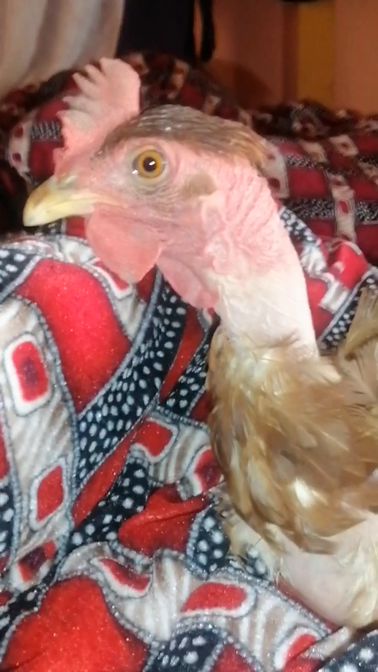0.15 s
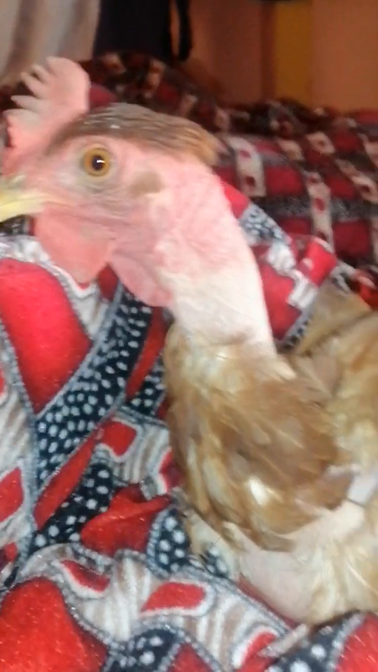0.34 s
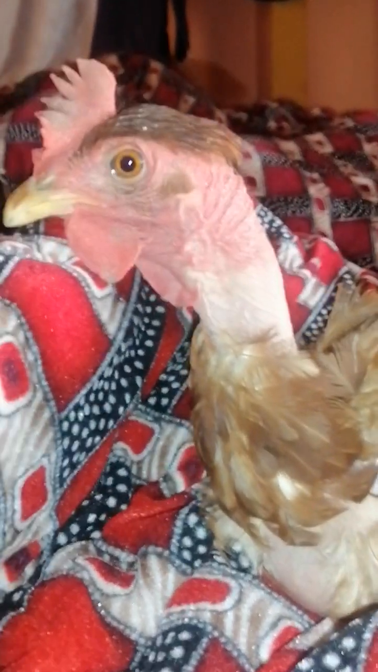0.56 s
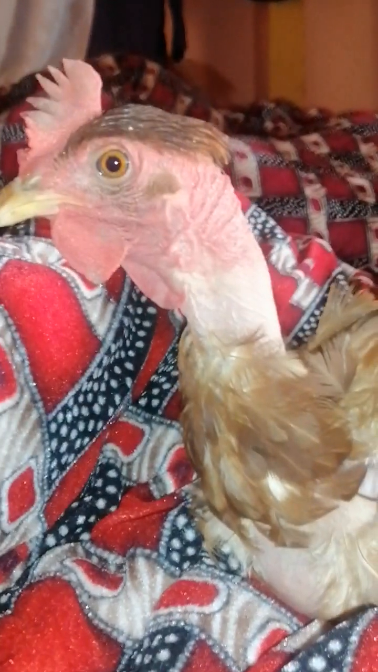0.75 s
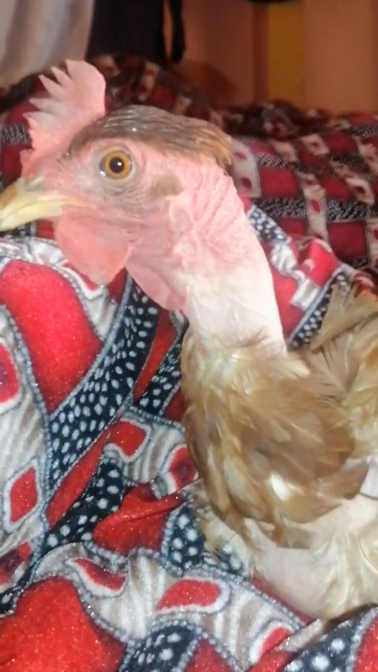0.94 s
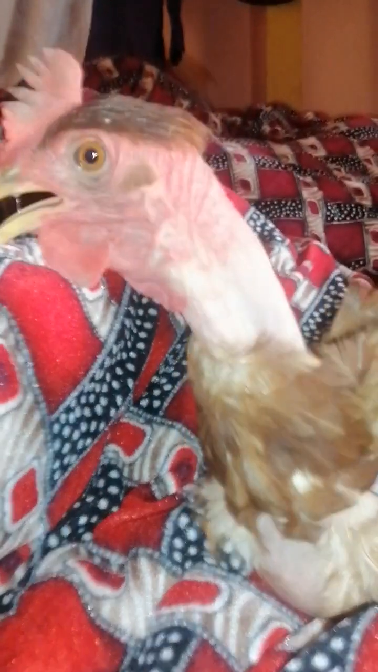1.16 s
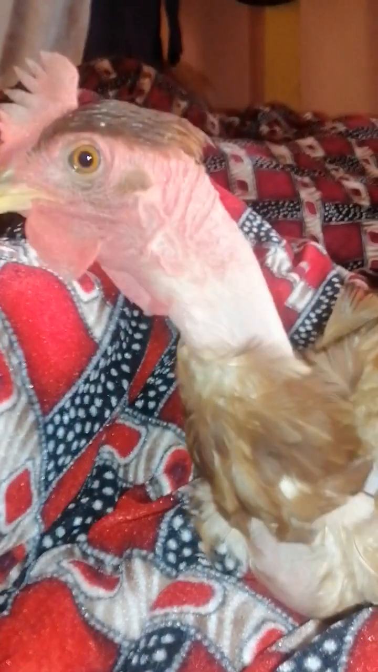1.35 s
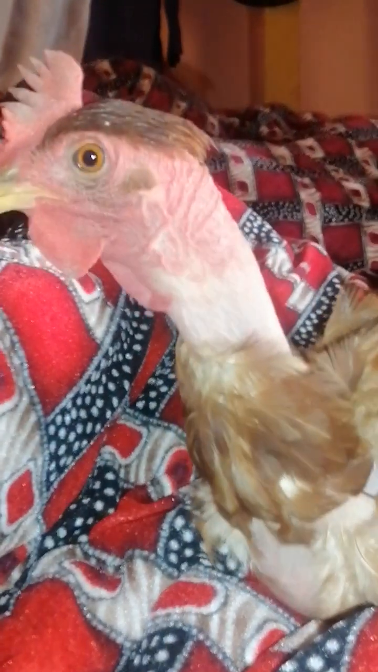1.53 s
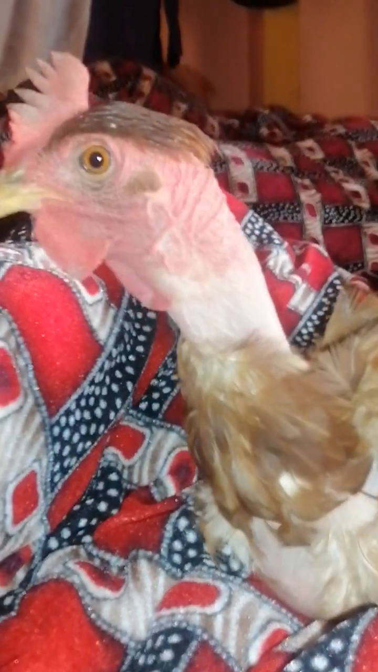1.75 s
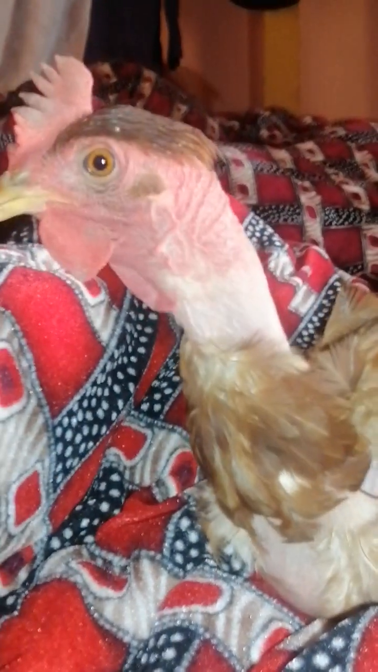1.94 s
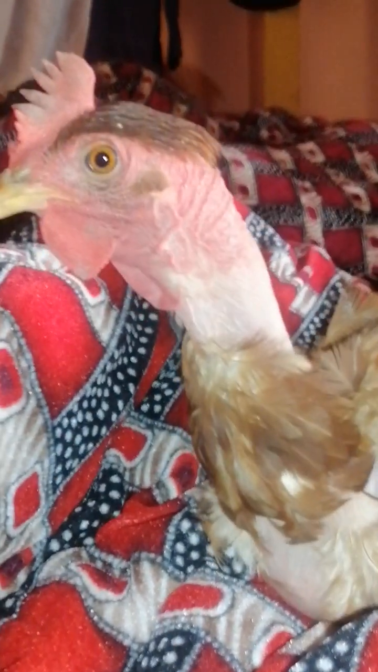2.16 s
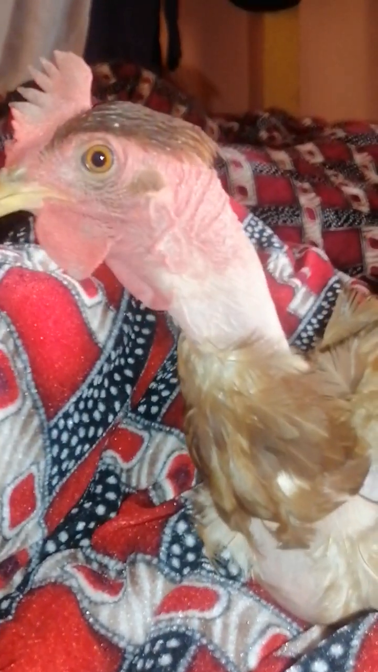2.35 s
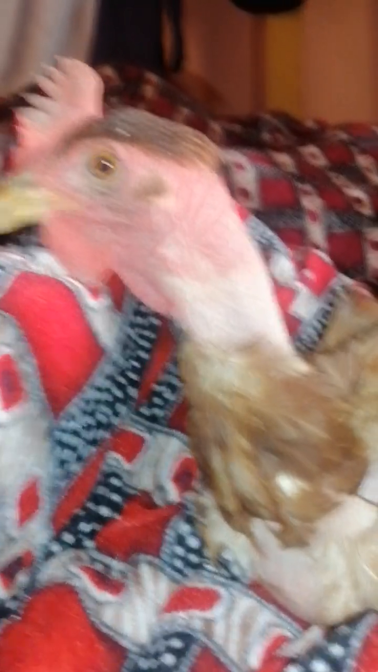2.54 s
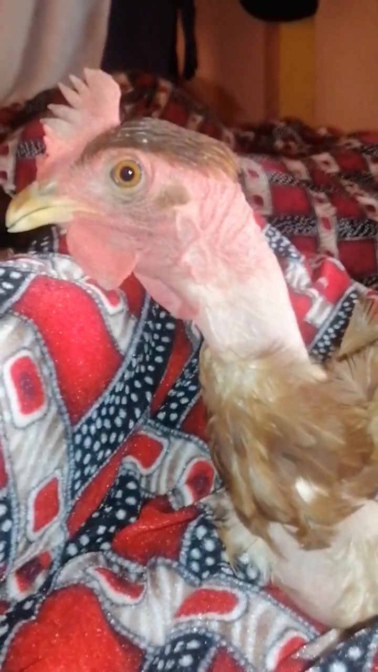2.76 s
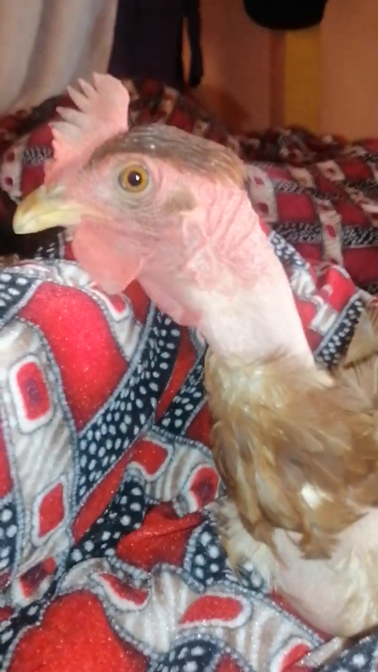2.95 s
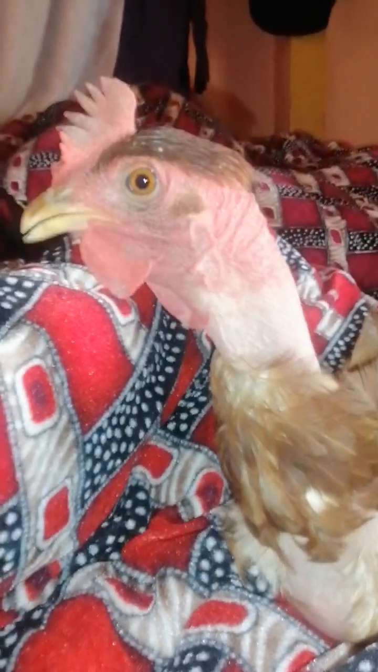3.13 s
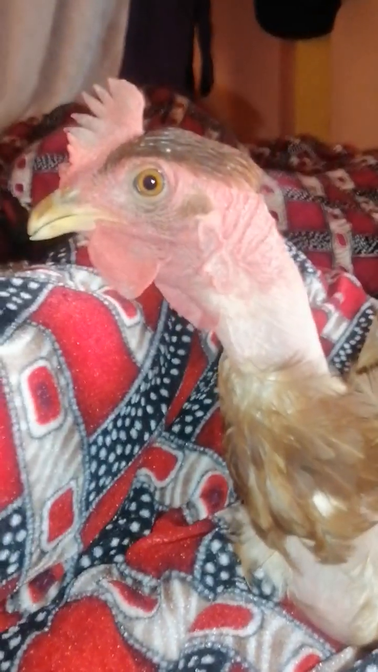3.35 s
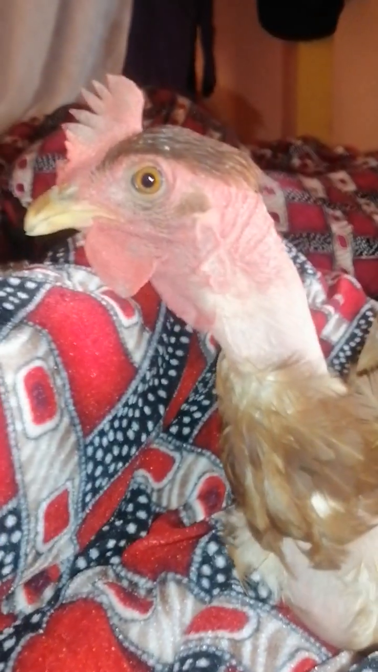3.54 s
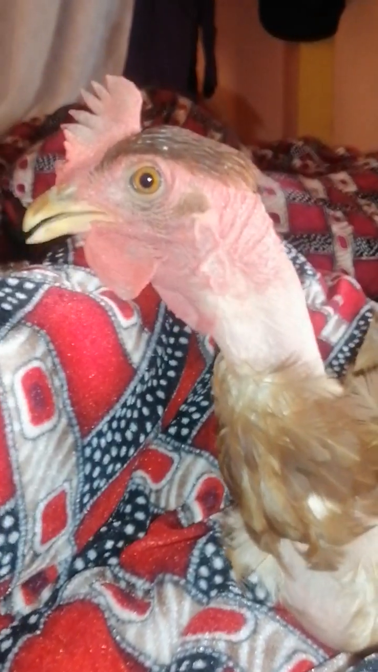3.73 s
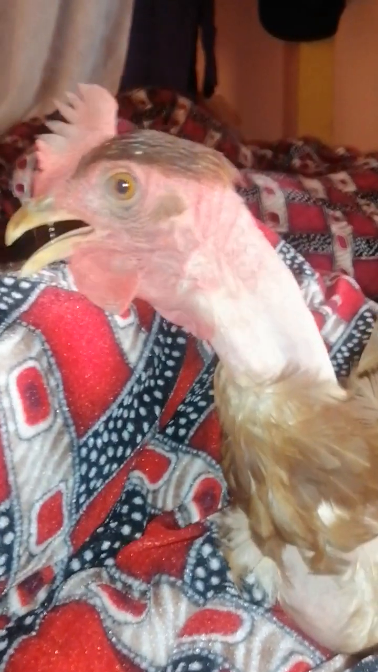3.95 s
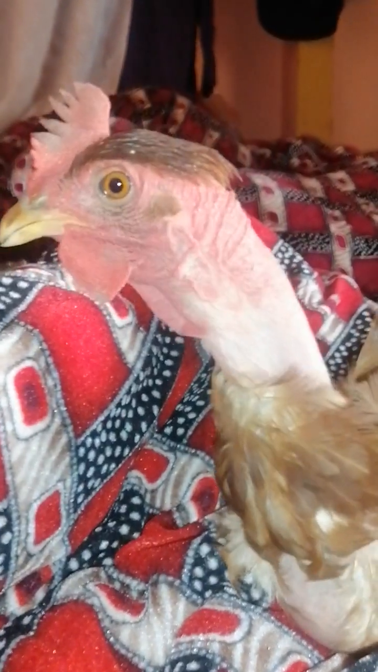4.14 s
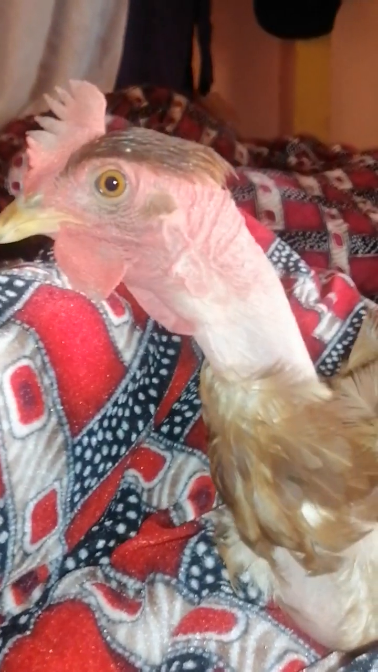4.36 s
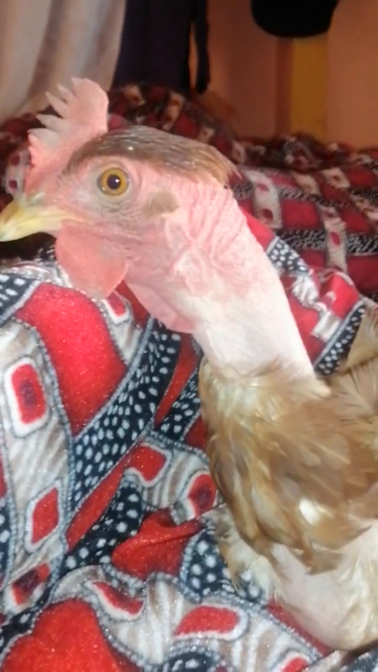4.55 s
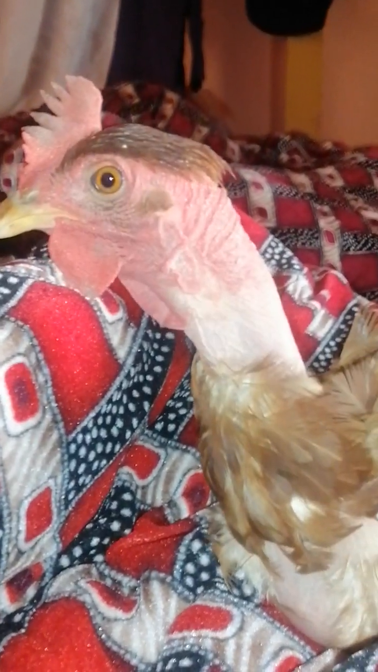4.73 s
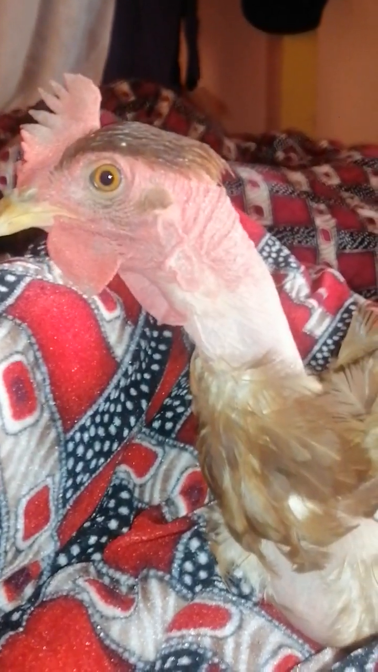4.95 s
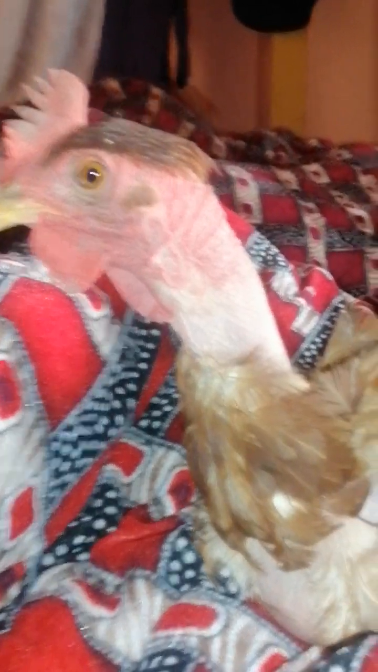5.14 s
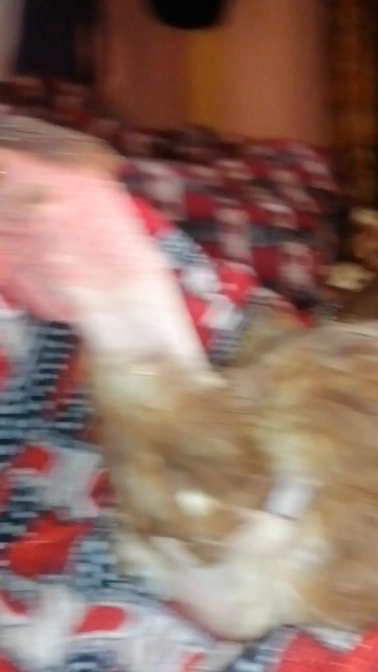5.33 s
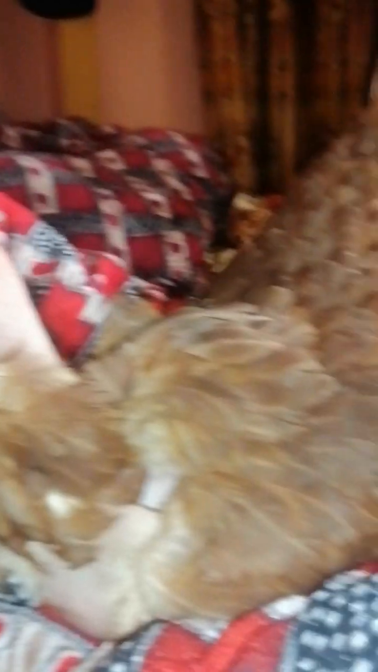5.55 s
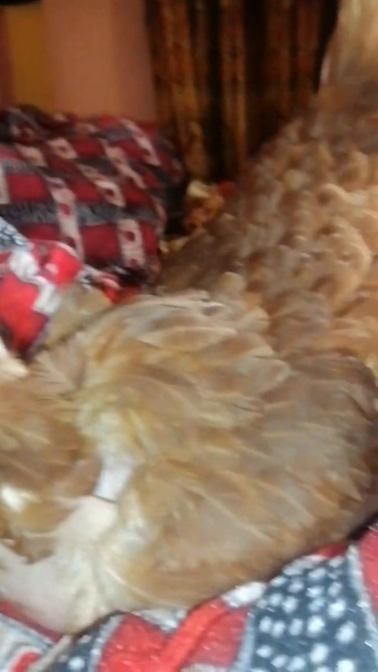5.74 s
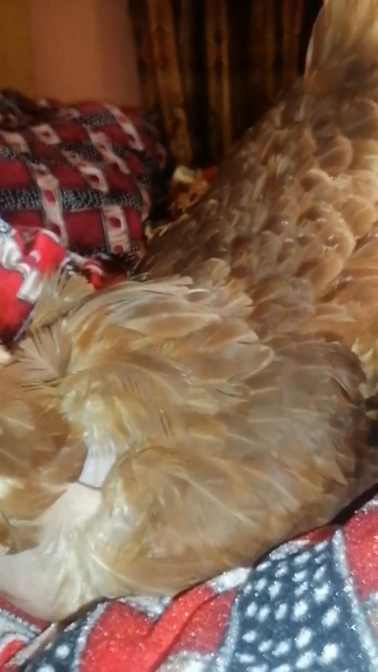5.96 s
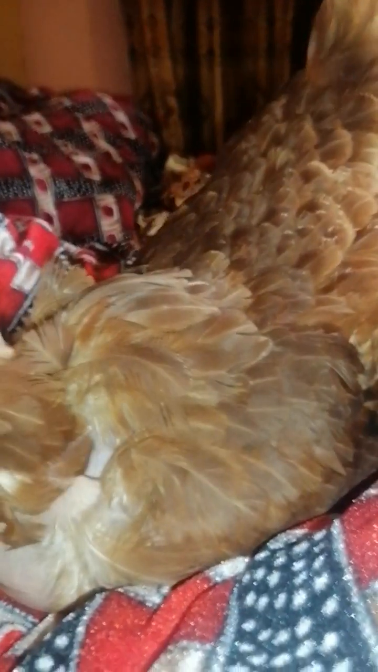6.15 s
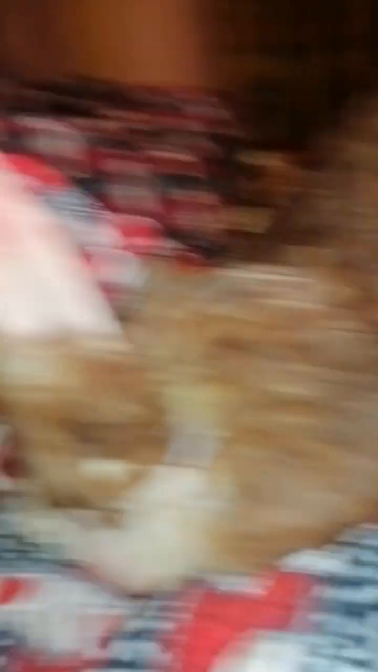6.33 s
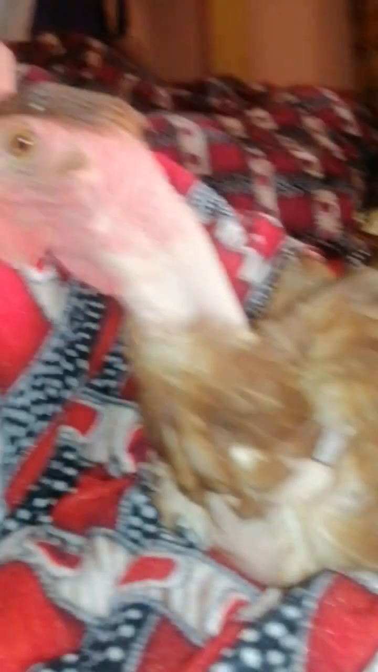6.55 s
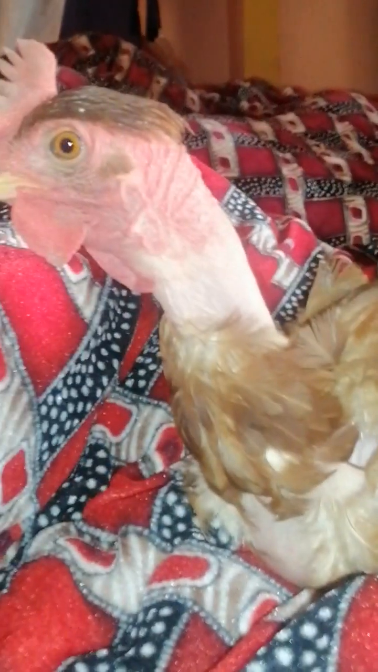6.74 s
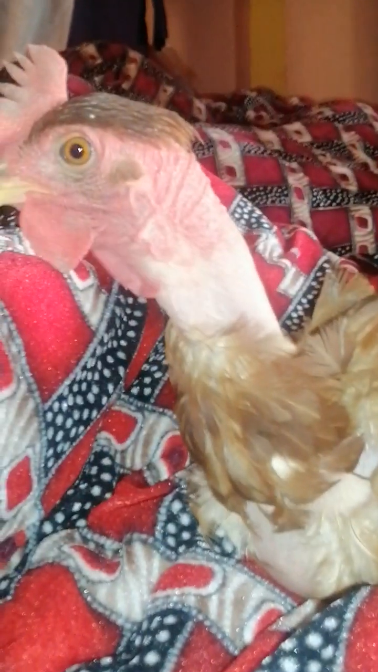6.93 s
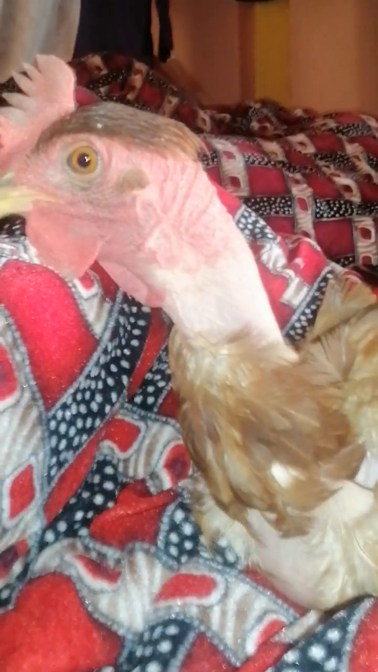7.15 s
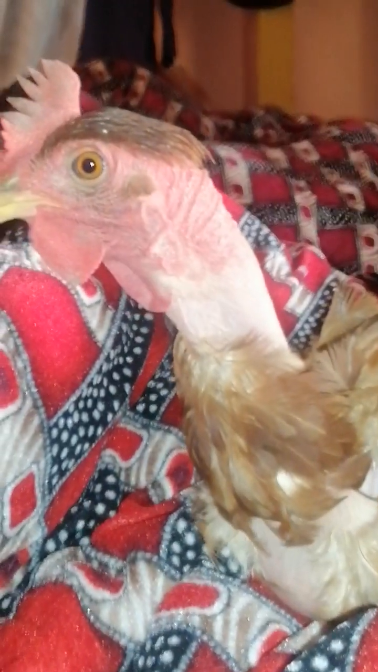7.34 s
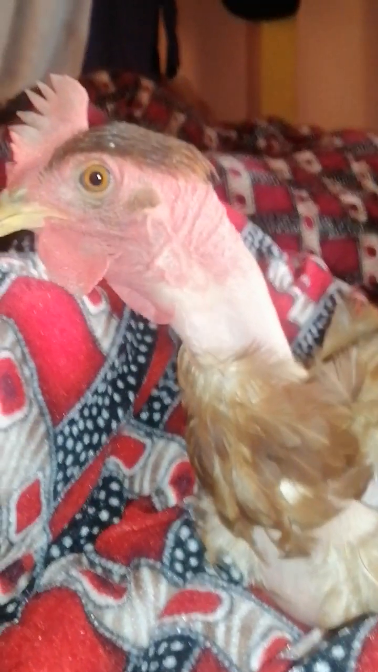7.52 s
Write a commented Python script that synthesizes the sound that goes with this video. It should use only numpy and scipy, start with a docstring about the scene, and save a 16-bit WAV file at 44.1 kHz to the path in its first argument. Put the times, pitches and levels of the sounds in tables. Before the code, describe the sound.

Quiet room hush and breathy fabric hiss open, with a tiny tick. A nearby hen then cackles: a strained, nasal, open-beaked squawk, a regular run of low, throaty clucks, another squawk, a pause filled by cloth sliding mostly on the left, then a last squawk and a few clucks. Close, dry stereo pickup with brief indoor reflections, handling rumble and very faint far-off chirps.

```python
"""Low rumble, a faint hum and cloth brushing past a hand-held camera open the scene in a small room.
Then a hen close by cackles: three long squawks, each led by a cluck, with more clucks after the
first and the third. Her voice is a train of pulses, air puffs and flutters sent through throat and
beak resonances. Cloth and hand are shaped noise, ticks are decaying bursts, and faint far-off peeps
are gliding sines heard only by their reflections. A gain control holds down the loudest calls."""
import sys
import numpy as np
from scipy import signal
from scipy.fft import rfft, irfft
from scipy.io import wavfile
from scipy.ndimage import uniform_filter1d

SR = 44100
rng = np.random.default_rng(int(sys.argv[2]) if len(sys.argv) > 2 else 0)


def int16_out(signal):
    """Quantize to a 16-bit WAV file."""
    q = np.round(np.clip(np.atleast_2d(signal).T, -1, 1) * 32767)
    wavfile.write(sys.argv[1], SR, q.astype(np.int16))


N = 334719
TIME = np.arange(N) / SR

# Colour of the throat with the beak nearly shut. Each row: frequency in Hz, relative level in dB.
NEARLY_SHUT_BEAK = [(120, -32), (225, -5.5), (620, -4.5), (1080, 4), (1750, -24.5), (2150, -22.5),
                    (2700, -26), (3300, -14), (3850, -43), (4400, -25), (5300, -38.5), (6600, -27.5),
                    (8700, -42.5), (11500, -56.5)]
# Colour of cloth fibres, also of the ticks. Each row: frequency in Hz, relative level in dB.
CLOTH_COLOUR = [(59, -47), (100, -13), (205, 0), (355, -3), (438, -1.5), (640, -5), (742, -3), (1430, -9),
                (3180, -6.5), (4020, -14.5), (6260, -1.5), (9150, -21), (12800, -24), (14500, -19.5),
                (15500, -21.5)]


def amp(db):
    """Decibels to gain."""
    return 10 ** (np.asarray(db) / 20)


def evened(x):
    """Scales to rms 1."""
    return x / np.sqrt(np.mean(x ** 2) + 1e-20)


def read(points, hz):
    """Reads a table on a log-frequency axis."""
    f, value = np.transpose(points)
    return np.interp(np.log(hz + 1), np.log(f), value)


def add(mix, s, sound):
    """Adds a sound into the mix at time s, cut off where the mix ends."""
    part = mix[max(round(s * SR), 0):][:len(sound)]
    part += sound[:len(part)]


def wobble(length, hz):
    """Random curve of rms 1: straight lines between hz random points a second."""
    at = np.arange(length) * hz / SR
    return evened(np.interp(at, np.arange(2048), rng.standard_normal(2048)))


def swell(middle_s, half_width_s):
    """A movement that speeds up and slows down again: a bell curve of height 1."""
    return np.exp(-((TIME - middle_s) / half_width_s) ** 2)


def noise(spectrum):
    """Noise of rms 1 with the given spectrum."""
    gain = amp(read(spectrum, np.fft.rfftfreq(N, 1 / SR)))
    return evened(irfft(rfft(rng.standard_normal(N)) * gain, N))


def colour(x, spectrum, size=4096):
    """A causal filter of unit energy: each pulse rings on in the peaks of the spectrum."""
    log_gain = np.log(amp(read(spectrum, abs(np.fft.fftfreq(size, 1 / SR)))))
    # minimum phase, so the ringing only follows the pulse
    ring = np.fft.ifft(np.exp(np.conj(signal.hilbert(log_gain)))).real[:size // 2]
    return signal.oaconvolve(x, ring / np.linalg.norm(ring))[:len(x)]


def sharpen(x, edge_db, corner_hz):
    """Lifts or lowers the treble above a corner, as a harder or softer closing of the membranes does."""
    lowpass = signal.butter(2, corner_hz, fs=SR, output="sos")
    soft = signal.sosfiltfilt(lowpass, x)
    return soft + amp(edge_db) * (x - soft)


def resonate(x, hz, width_hz):
    """Shifts the curve hz down to zero, smooths, and shifts back: a moving resonance of gain 1."""
    turn = np.exp(2j * np.pi * np.cumsum(hz) / SR)
    r = np.exp(-np.pi * width_hz / SR)
    smoothed = signal.lfilter([(1 - r) / 2, (1 - r) / 2], [1, -r], x / turn)
    return 2 * (turn * smoothed).real


def background():
    """The hush of the room, a faint wavering hum and the rumble of the hand shifting its grip."""
    # Each row: frequency in Hz, relative level in dB.
    hush_colour = [(12, -36), (20, -2), (103, -5.5), (137, -9.5), (274, -13.5), (298, -15.5), (597, -16.5),
                   (649, -20.5), (1270, -23), (1720, -26.5), (4070, -28.5), (6190, -55), (15500, -31)]
    # Each row: frequency in Hz, rms level in dB.
    hum_tones = [(62, -81), (108, -75.5)]
    # Each row: frequency in Hz, relative level in dB.
    rumble_colour = [(20, -4.5), (70, -0.5), (130, -6), (400, -35.5), (2000, -78)]
    # Each row: middle in seconds, half-width in seconds, relative level in dB.
    grips = [(.2, 0.54, -75), (2.75, 0.41, -59.5), (3.5, .45, -63), (4.8, .25, -64.5), (7.499, 0.29, -67)]
    still_hand_db = -81

    shared_hush = amp(-74.0) * noise(hush_colour)
    side_hush = amp(-66.5) * np.array([noise(hush_colour), noise(hush_colour)])
    hum = np.zeros(N)
    for hz, db in hum_tones:
        phase = 2 * np.pi * hz * TIME + 0.33 * wobble(N, 17.0)
        hum += amp(db) * np.sqrt(2) * np.sin(phase)
    power = amp(still_hand_db) ** 2
    for s, half_width_s, db in grips:
        power = power + (amp(db) * swell(s, half_width_s)) ** 2
    rumble = np.sqrt(power) * noise(rumble_colour) * amp([[2], [-3]])
    return shared_hush + side_hush + hum + rumble


def cloth():
    """Fibres slip by the microphone ports: a grainy hiss that follows the speed of each stroke."""
    # Each row: middle in seconds, half-width in seconds, relative level in dB, left minus right in dB.
    strokes = [ (.125, 0.028, -54.5, -16), (.41, 0.12, -53.5, -31), (0.622, 0.14, -54.5, -1),
               (0.738, 0.045, -55.5, -12), (.92, 0.11, -63.5, 5), (1.68, 0.2, -63.5, 13),
               (1.96, 0.11, -63.5, -10), (2.57, 0.19, -64, 16), (2.70, 0.05, -53, 2),
               (2.851, 0.16, -61, -3), (3.72, .17, -59.5, 3), (4.62, 0.14, -69.5, -16),
               (5.311, 0.072, -54.5, -23), (5.53, 0.19, -47, -32), (5.80, .12, -59, -25),
               (6.62, 0.16, -52, -29), (6.84, 0.012, -59.5, -22), ]
    # Colour at the left port alone. Each row: frequency in Hz, relative level in dB.
    left_colour = [(100, -11.5), (1000, -15.5), (3200, -10), (4200, -13.5), (6000, -4), (7800, -3),
                   (10000, -10.5), (12000, -17.5), (15500, -21.5)]
    creep_db = -71  # between strokes the cloth keeps creeping

    power = np.ones((2, 1)) * amp(creep_db) ** 2
    for s, half_width_s, db, side_db in strokes:
        sides = 2 * amp([[side_db], [0]]) / (1 + amp(side_db))
        power = power + (amp(db) * sides * swell(s, half_width_s)) ** 2
    near = noise(CLOTH_COLOUR)
    # the left port also hears a little of the right one's hiss, 0.58 ms later
    left = 0.26 * np.roll(near, round(0.00058 * SR)) + noise(left_colour)
    grain = amp(1.1 * wobble(N, 150))
    return np.array([left, near]) * grain * np.sqrt(power)


def ticks(decay_s=0.0033):
    """A finger ticks on the camera: dry decaying bursts of noise, louder at the right port."""
    # Each row: start in seconds, relative level in dB.
    taps = [(0.748, -52.5), (6.855, -47)]
    out, t = np.zeros(N), TIME[:SR // 20]
    for s, db in taps:
        add(out, s, amp(db) * np.exp(-t / decay_s))
    return out * noise(CLOTH_COLOUR) * amp([[-8], [4]])


def room(x, delay_s):
    """Sparse random reflections after a delay, each band dying at its own speed."""
    # How long the room rings. Each row: frequency in Hz, time to fall 60 dB in seconds.
    ring_times = [(200, .16), (600, .23), (1200, .29), (3000, .26), (7000, .28), (14000, .18)]
    hits = rng.random((2, SR // 2)) < 3000 / SR  # about 3000 reflections a second
    taps = rng.standard_normal((2, SR // 2)) * hits * (TIME[:SR // 2] > delay_s)
    hz, t, bands = signal.stft(taps, SR, nperseg=256)
    decay = np.exp(-np.log(1000) * t / read(ring_times, hz)[:, None])
    tail = signal.istft(bands * decay, SR, nperseg=256)[1]
    return signal.fftconvolve(x[None], tail / np.linalg.norm(tail[0]), axes=1)[:, :N]


def peeps():
    """Far-off chirps: two thin, unsteady falling whistles that overlap, heard only by their reflections."""
    # Each row: start in seconds, relative level in dB.
    chirps = [(0.881, -63.5), (2.822, -61.5), (4.668, -64), (4.849, -65), (7.11, -67)]
    # Each row: delay in seconds, length in seconds, start in Hz, end in Hz, relative level in dB.
    whistles = [(0, .085, 5420, 4710, 1.5), (0.024, 0.08, 3950, 3010, 0.5)]
    waver, arriving_db = .09, 4  # waver: rms share of the pitch

    out = np.zeros(N)
    for s, db in chirps:
        for delay, length, first_hz, last_hz, note_db in whistles:
            n = round(length * SR)
            hz = np.linspace(first_hz, last_hz, n) * (1 + waver * wobble(n, 1400))
            whistle = np.hanning(n) * np.sin(2 * np.pi * np.cumsum(hz) / SR)
            add(out, s + delay, amp(db + note_db + arriving_db) * whistle)
    return room(out, delay_s=0.0018)


def flutter(length, first_hz, last_hz, db, rasp_db):
    """The membranes flutter without closing: a gliding near-sine, and a rasp that grows against it."""
    n, ring_out = round(length * SR), (0, SR // 20)
    hz = np.linspace(first_hz, last_hz, n) * (1 + .06 * wobble(n, 470))
    push = amp(db) * signal.windows.tukey(n, .4)
    tone = push * np.sqrt(2) * np.sin(2 * np.pi * np.cumsum(hz) / SR)
    rasp = push * amp(rasp_db + np.linspace(-6, 2, n)) * rng.standard_normal(n)
    rasp = colour(np.pad(rasp, ring_out), NEARLY_SHUT_BEAK)
    rasp = sharpen(rasp, edge_db=15.0, corner_hz=1810)
    return amp(-2.5) * np.pad(tone, ring_out) + amp(-3) * rasp


def croaks():
    """Soft half-voiced flutters just before a cluck, or between a cluck and the squawk after it."""
    # Each row: start in seconds, length in seconds, start in Hz, end in Hz, relative level in dB,
    # rasp against the tone in dB.
    notes = [ (1.101, 0.021, 233, 287, -45, -19), (1.151, 0.026, 534, 914, -31, -18),
             (1.18, 0.017, 889, 682, -24, -31.5), (3.94, 0.012, 483, 747, -20, -21.5),
             (6.141, 0.023, 780, 857, -42.5, -2), (6.207, 0.027, 772, 597, -34.5, -18), ]
    out = np.zeros(N)
    for s, *note in notes:
        add(out, s, flutter(*note))
    return out


def syrinx(hz, rough, air, leak, size=12):
    """One pulse a cycle; roughness unsettles timing and strength, and air hisses through in puffs."""
    jitter, shimmer_db = .1, 1.8  # spread at full roughness: share of the pitch, pulse strength
    n = len(hz)
    turns = np.cumsum(hz * np.exp(jitter * rough * wobble(n, 450))) / SR
    # a pulse falls on every whole turn, between samples if need be
    at = np.interp(np.arange(int(turns[-1]) + 1), turns, np.arange(n))
    index = at.astype(int)
    shimmer = amp(shimmer_db * rough[index] * rng.standard_normal(len(at)))
    strength = np.sqrt(SR / hz[index]) * shimmer
    # each pulse is a short windowed sinc
    near = index[:, None] + np.arange(2 * size)
    offset = near - at[:, None] - size
    shape = np.sinc(offset) * np.cos(np.pi * offset / (2 * size + 2)) ** 2
    pulses = np.bincount(near.ravel(), (strength[:, None] * shape).ravel(), n)[:n]
    highpass = signal.butter(1, 3500, "highpass", fs=SR, output="sos")
    hiss = signal.sosfilt(highpass, rng.standard_normal(SR)[:n])
    puffs = np.exp(-(turns % 1) / 0.63)  # fading within each cycle
    return air * (rough + leak) * puffs * hiss - pulses


def clucks():
    """A few slow pulses through a nearly shut beak, gliding in pitch; some begin as a rasping flutter."""
    # Each row: start in seconds, raspy lead-in in seconds, nominal voiced length in seconds,
    # middle pitch in Hz, end pitch in Hz, relative level in dB, roughness 0-1,
    # relative treble edge in dB, throat tuning as a factor.
    notes = [ (1.124, .006, .029, 383, 384.6, -28, 0.19, -6, .99),
             (1.594, 0, 0.038, 360, 391, -25, .3, -0.5, .977),
             (1.8428, 0, 0.037, 381.8, 405, -26, 0.26, -.5, .984),
             (2.1443, .012, .029, 365, 350.6, -25, 0.04, -4.5, 1.087),
             (2.463, .019, .017, 287.3, 264.3, -24, 0.1, 0, .97),
             (2.7249, .023, 0.017, 266, 272.4, -22.5, 0.23, -1, 1.004),
             (3.045, .019, 0.02, 279.8, 288, -22, 0.16, -1, 1.006),
             (3.314, 0.001, 0.036, 300.4, 266.3, -24.5, 0, 3, 0.985),
             (3.6173, 0.00013, 0.038, 289.9, 285.8, -25.5, .13, 0.5, 1.0),
             (3.8905, 0.001, .043, 236.8, 209.2, -17, 0, -2.5, 1.012),
             (6.155, .016, 0.029, 235.6, 255.7, -41, 0.82, -1.5, 1.12),
             (6.71, 0, 0.041, 324.6, 303, -26, 0.41, 0, .98),
             (7.0086, 0, .038, 375.6, 292.7, -27.5, 0.56, -4, 1.02),
             (7.3597, .02, .018, 290.3, 282, -26, 0.18, .5, 0.98), ]
    # without a lead-in the pitch starts at scoop_hz; after a full one it drops in from above
    scoop_hz, drop_in, full_lead_s = 242.7, 1.12, .016
    # the lead-in is a rising flutter, set below its cluck, that runs on into it
    lead_from_hz, lead_to_hz, lead_db, lead_rasp_db, lead_overlap_s = 780, 920, -15, 5, 0.0065

    out = np.zeros(N)
    for s, lead_s, length, middle_hz, last_hz, db, rough, edge_db, tuning in notes:
        lead_s = max(lead_s, 0)
        led = min(lead_s / full_lead_s, 1)
        lead_in = flutter(lead_s + lead_overlap_s, lead_from_hz, lead_to_hz, db + lead_db, lead_rasp_db)
        add(out, s - lead_s, led * lead_in)
        first_hz = (1 - led) * scoop_hz + led * drop_in * middle_hz
        t = np.arange(-1 / first_hz, length + 0.0013, 1 / SR)  # one weak cycle leads the way
        hz = np.interp(t, [0, length / 2, length], [first_hz, middle_hz, last_hz])
        pulses = syrinx(hz, np.clip(rough, 0, 1) * (t > 0), air=2.76, leak=0.89)
        push_at = [t[0], 0, 0.25 * length, 0.5 * length, length, t[-1]]
        push_db = np.interp(t, push_at, [-22.0, -2.0, 2.5, 3, -1.5, -18.0])
        # a stronger push also brightens the pulses
        drive = amp(db + push_db) * sharpen(pulses, edge_db - 2.0 + 1.1 * push_db, corner_hz=1900)
        throat = np.array(NEARLY_SHUT_BEAK) * [tuning, 1]
        add(out, s + t[0], colour(np.pad(drive, (0, SR // 20)), throat))
    return out


def squawks():
    """Long open-beaked notes: a ragged start, a clean rising tone, and a break at the end."""
    # Each row: start in seconds, ragged for seconds, breaks after seconds, length in seconds,
    # relative effort in dB, relative treble edge in dB, mouth notch at the end in Hz.
    calls = [ (1.186, 0.024, 0.22, .272, -8.5, -1, 3700), (3.968, 0.013, 0.24, 0.29, -7.5, -1.5, 3240),
             (6.227, 0.1, .257, 0.2943, -8.5, -2, 3480), ]
    # One list a squawk, before bend, sag and waver. Each row: scene time in seconds, pitch in Hz.
    pitches = [
        [(1.2, 574), (1.212, 582.8), (1.222, 554), (1.276, 556.2), (1.336, 589.4), (1.362, 589), (1.394, 610.8),
         (1.414, 653.7)],
        [(3.985, 506.8), (3.995, 527), (4.027, 548.7), (4.151, 577.4), (4.197, 590.5), (4.215, 622.7)],
        [(6.238, 518.8), (6.242, 533.5), (6.27, 513.4), (6.286, 568.4), (6.322, 605.2), (6.35, 573),
         (6.438, 576.6), (6.464, 601.7), (6.482, 600)],
    ]
    # The throat with the beak wide open. Each row: frequency in Hz, relative level in dB.
    open_throat = [(150, -49.5), (330, -7), (570, -8.5), (1150, 3), (1700, -12), (2300, -11.5),
                   (3200, -10.5), (4200, -23), (5100, -29), (6000, -15.5), (6950, -20), (7600, -15.5),
                   (9000, -34.5), (12500, -44.5)]
    # it snaps on, strains into a purer tone just before it breaks, collapses, and shuts off
    attack_s, strain_s, collapse_s, release_s = 0.01, 0.0083, 0.0091, .011
    onset_db, strain_db, broken_db, shut_db = -15, 2.5, -4.5, -16
    # the pitch drops in from above (share of the pitch), wavers (rms share) and sags after the break
    onset_bend, bend_s, waver, sag_hz_per_s = 0.18, .007, .0016, 4800
    # roughness 0-1 of the ragged start and of the broken end; how fast the tone settles
    rough_start, rough_broken, settle_s = 0.55, 0.79, .014
    # while ragged the voice is still gathering strength, and duller
    ragged_db, ragged_edge_db = -11.5, -4
    # the treble opens with the beak and keeps growing while the note is held
    opening_s, onset_edge_db, open_edge_db, edge_db_per_s = 0.017, -20.5, -2.5, 33.5
    # after the break the voice fades and dulls
    broken_edge_db, fade_db_per_s, dull_db_per_s = -1.5, 149.5, 199
    # air leaks past the membranes, most at first: extra share, lasting share, time to seal
    leak_start, leak_held, seal_s = 0.34, 0.051, 0.077
    # the strain before the break brings out one ring of the throat
    strain_ring_hz, strain_ring_width_hz, strain_ring_db = 2820, 900, 0.5
    # a side cavity of the mouth swallows one band; the throat dents another
    first_notch_hz, throat_notch_hz, throat_notch_depth = 3950, 2650, 0.5
    # the windpipe rings most at the start, then its ring fades
    pipe_hz, pipe_width_hz, pipe_db, pipe_fade_db_per_s = 3100, 690, 7.5, 109.5

    drive = np.zeros(N)
    for (s, ragged_s, break_s, length, db, edge, last_notch_hz), pitch in zip(calls, pitches):
        t = np.arange(0, length, 1 / SR)
        ragged = np.exp(-np.maximum(t - ragged_s, 0) / settle_s)
        closing = np.interp(t, [break_s - strain_s, break_s - strain_s / 2], [0, 1])
        broken = np.interp(t, [break_s, break_s + collapse_s], [0, 1])
        strain = closing * (1 - broken)
        since_break_s = np.maximum(t - break_s, 0)

        hz = np.interp(s + t, *np.transpose(pitch)) * (1 + onset_bend * np.exp(-t / bend_s))
        hz = (hz - sag_hz_per_s * since_break_s) * (1 + waver * wobble(len(t), 200))

        gate_db = np.interp(t, [0, attack_s, length - release_s, length], [onset_db, 0, 0, shut_db])
        gathering_db = ragged_db * np.maximum(1 - t / (ragged_s + settle_s), 0)
        break_db = strain_db * strain + broken_db * broken - fade_db_per_s * since_break_s
        effort_db = db + gate_db + gathering_db + break_db

        held_edge_db = np.interp(t, [0, opening_s], [onset_edge_db, open_edge_db]) + edge_db_per_s * t
        closing_edge_db = broken_edge_db - dull_db_per_s * since_break_s
        edge_db = edge + ragged_edge_db * ragged
        edge_db = edge_db + held_edge_db * (1 - closing) + closing_edge_db * closing

        rough = np.clip(rough_start * ragged + rough_broken * broken, 0, 1)
        pulses = syrinx(hz, rough, air=3.2, leak=leak_held + leak_start * np.exp(-t / seal_s))
        call = amp(effort_db) * sharpen(pulses, edge_db, corner_hz=2600)
        strain_ring = resonate(call, np.full(len(t), strain_ring_hz), strain_ring_width_hz)
        call = call + strain * amp(strain_ring_db) * strain_ring
        # the mouth notch glides as the call goes on; two passes deepen it
        notch_hz = np.linspace(first_notch_hz, last_notch_hz, len(t))
        for _ in range(2):
            call = call - resonate(call, notch_hz, width_hz=1050)
        throat_band = resonate(call, np.full(len(t), throat_notch_hz), width_hz=570)
        call = call - throat_notch_depth * (1 - closing) * throat_band
        pipe_ring = resonate(call, np.full(len(t), pipe_hz), pipe_width_hz)
        call = call + amp(pipe_db - pipe_fade_db_per_s * t) * pipe_ring
        add(drive, s, call)
    return amp(-4.0) * colour(drive, open_throat)


def ports(x, lead_s):
    """The hen is nearer the left port, and the camera body colours each side differently."""
    # Each row: frequency in Hz, left minus right in dB.
    balance = [(300, 5), (600, 3.5), (1100, 0), (1600, -12), (2300, -5.5), (2900, -1.5), (3700, 0.5),
               (4600, 2.5), (5700, -2.5), (6600, -4), (7600, 10), (8700, 19.5), (10500, 6), (15000, 1)]
    hz = np.fft.rfftfreq(N, 1 / SR)
    # half of the level difference and of the time lead goes to each side
    left = amp(read(balance, hz) / 2) * np.exp(1j * np.pi * hz * lead_s)
    return irfft(rfft(x) * np.array([left, 1 / left]), N)


def echoes(x):
    """First reflections off nearby surfaces: they ripple the harmonics differently at each port."""
    # Each row: delay in seconds, relative level left in dB, relative level right in dB.
    surfaces = [(.0023, -30, -34), (.0041, -26, -19.5), (.0078, -24.5, -27.5), (0.0136, -16.5, -14.5)]
    return sum(np.roll(x, round(s * SR)) * amp([[left_db], [right_db]]) for s, left_db, right_db in surfaces)


def scene():
    """The hen close by, her echo in the room, and the small sounds around her."""
    # Colour of the echo. Each row: frequency in Hz, relative level in dB.
    walls = [(200, 1.5), (600, 1.5), (1080, -2.5), (1450, 0.5), (2300, 0), (3300, 0.5), (6000, 0),
             (15000, -1.5)]
    # Where her head is. Each row: time in seconds, added left minus right in dB.
    head = [(1.3, -2), (2.1, -1), (3.1, 0), (3.6, 4.5), (4.1, -3), (6.4, -1), (7.3, -3)]
    hen = croaks() + clucks() + squawks()
    # the beak points past the camera and sends its treble to the walls
    beamed = sharpen(hen, edge_db=1, corner_hz=1780)
    reverb = amp(-19.0) * room(colour(beamed, walls), delay_s=.005)
    hall = reverb + amp(-2.5) * echoes(beamed)
    side_db = np.interp(TIME, *np.transpose(head))
    direct = ports(hen, lead_s=0.00019) * amp(np.array([side_db, -side_db]) / 2)
    return background() + cloth() + ticks() + peeps() + direct + hall


def record(dry, threshold_db=-21.5, squeeze=0.67, recovery_db=40):
    """Gain control holds the loudest calls down and recovers at a steady pace; then a band limit."""
    edge_hz = 15750
    power = abs(uniform_filter1d((dry ** 2).mean(0), size=1100))
    power_db = 10 * np.log10(power + 1e-12)
    fall = TIME * recovery_db
    # a peak follower that sinks by recovery_db a second after each peak
    followed_db = np.maximum.accumulate(power_db + fall) - fall
    over_db = np.maximum(followed_db - threshold_db, 0)
    held = dry / amp(squeeze * uniform_filter1d(over_db, size=400))
    lowpass = signal.firwin(511, edge_hz, window=("kaiser", 9), fs=SR)
    return signal.oaconvolve(held, lowpass[None], "same")


dry = scene()
out = record(dry)
int16_out(out)
```